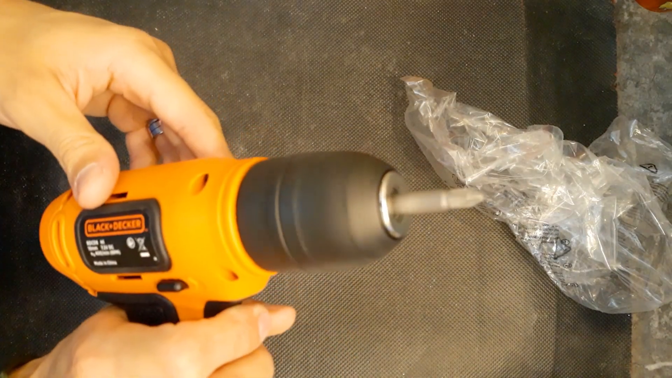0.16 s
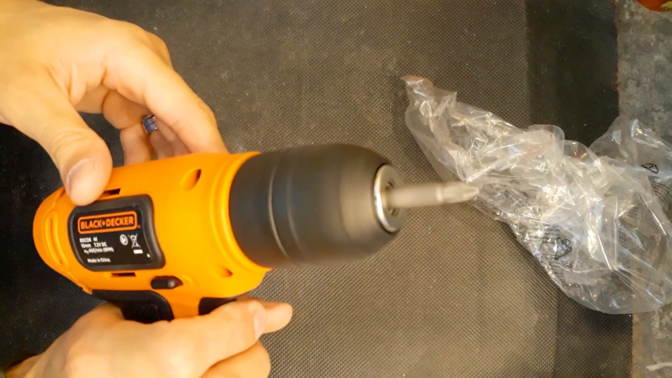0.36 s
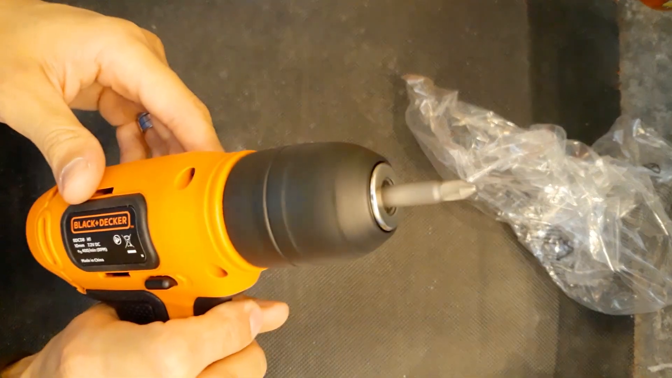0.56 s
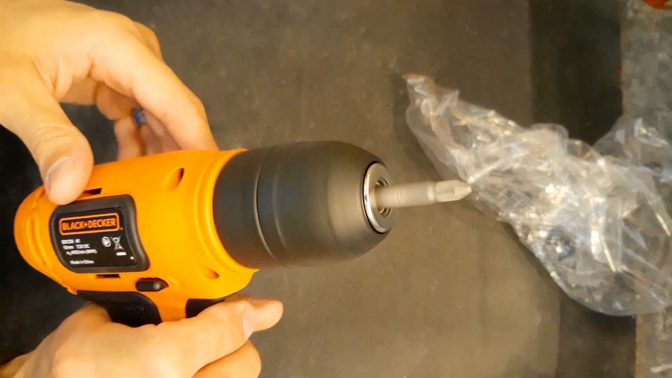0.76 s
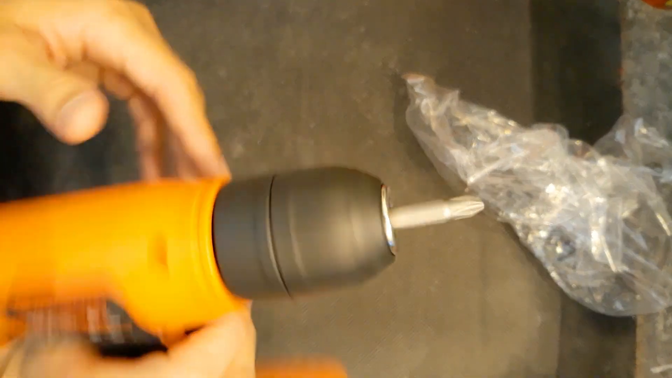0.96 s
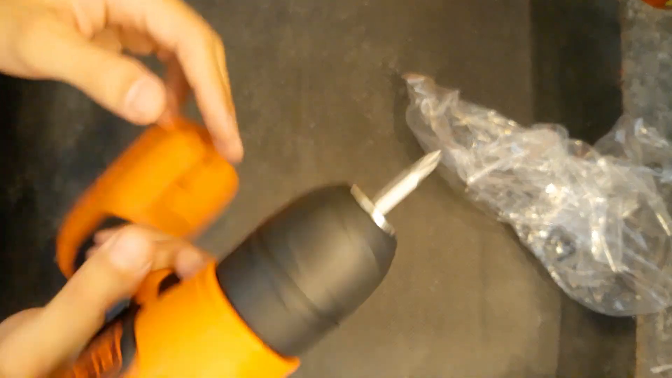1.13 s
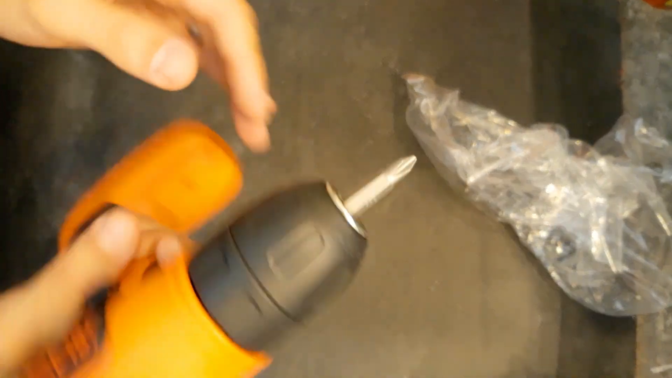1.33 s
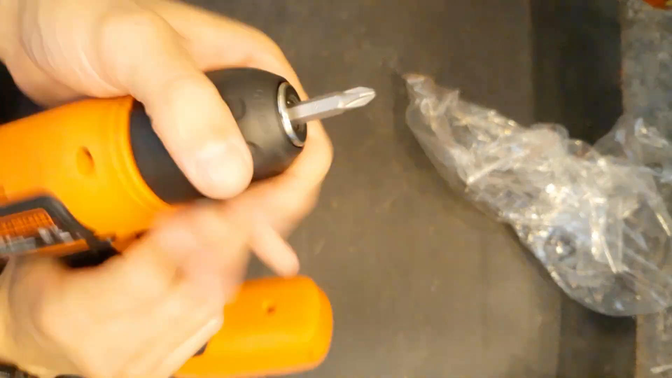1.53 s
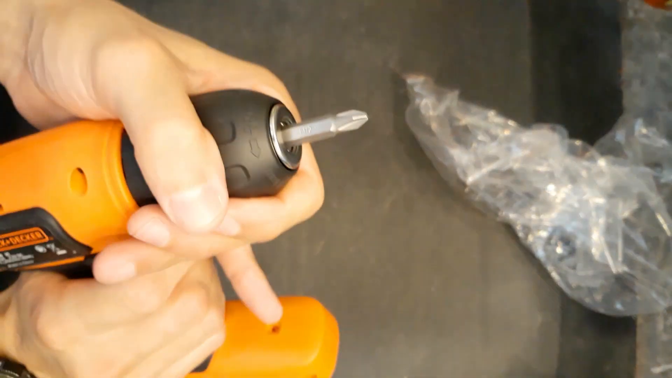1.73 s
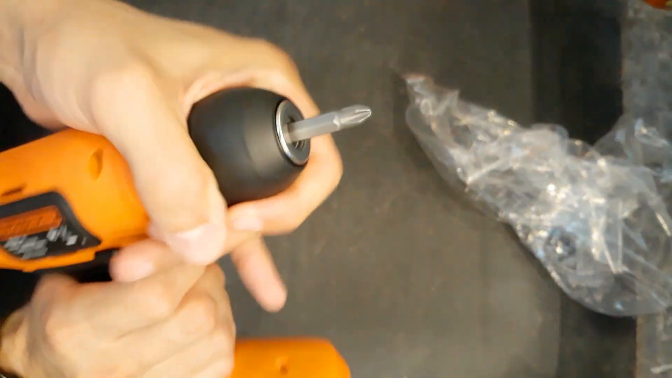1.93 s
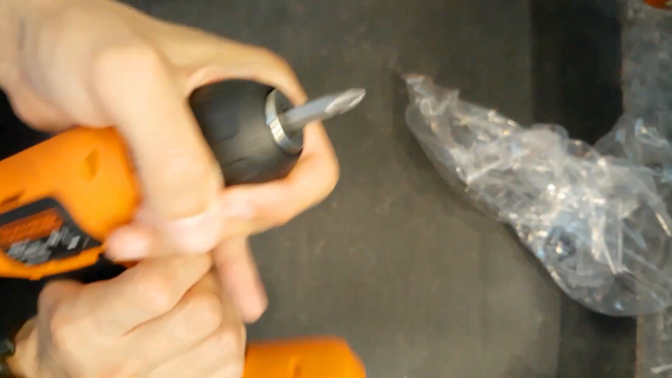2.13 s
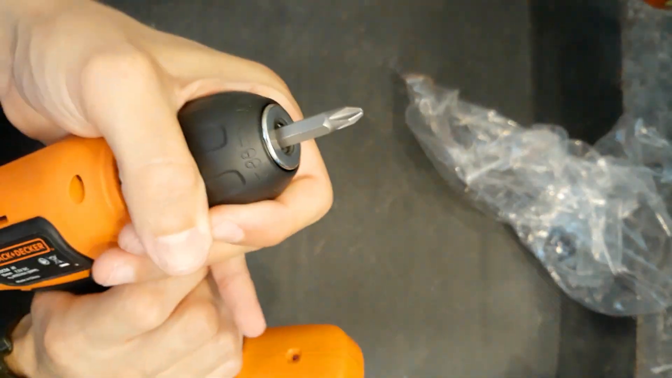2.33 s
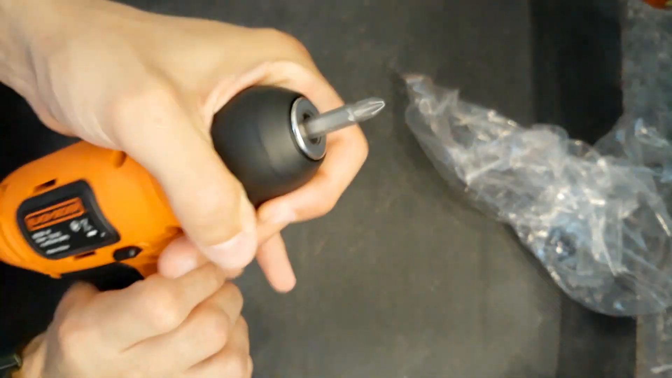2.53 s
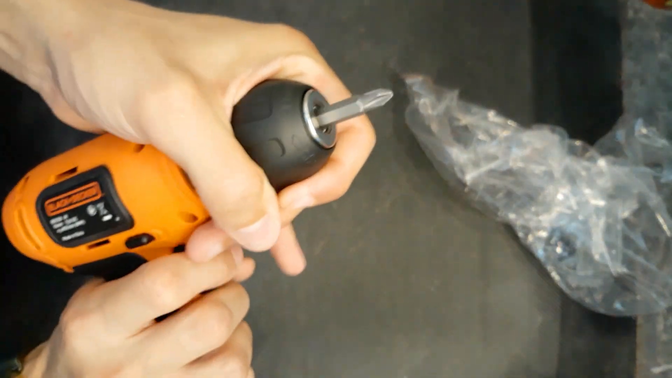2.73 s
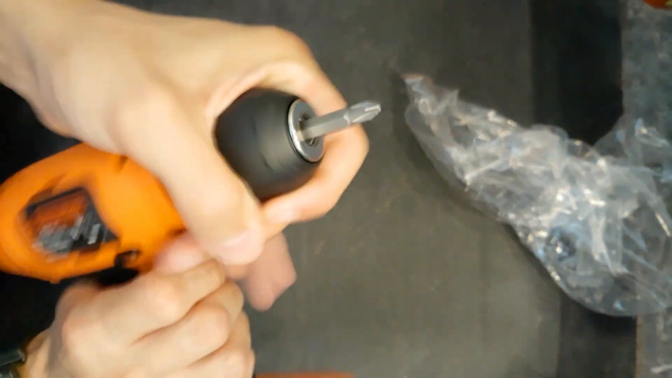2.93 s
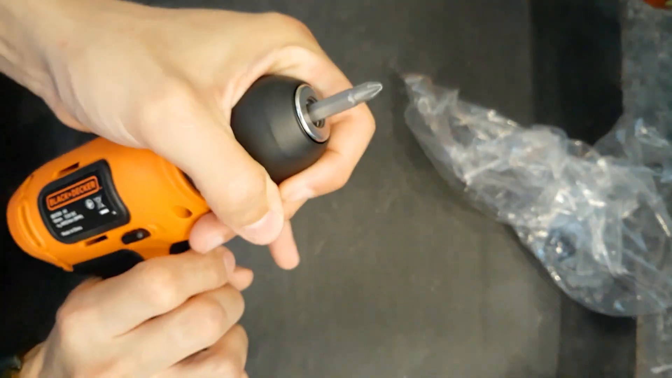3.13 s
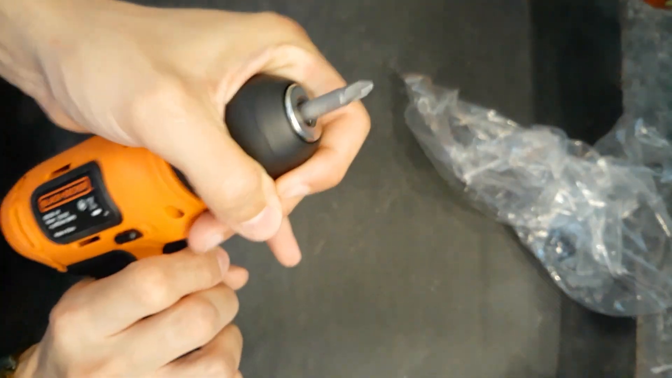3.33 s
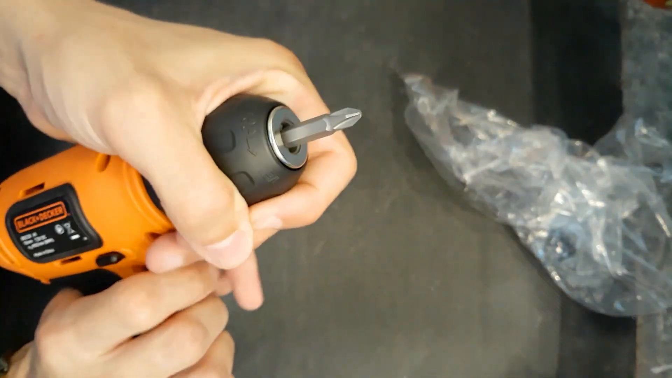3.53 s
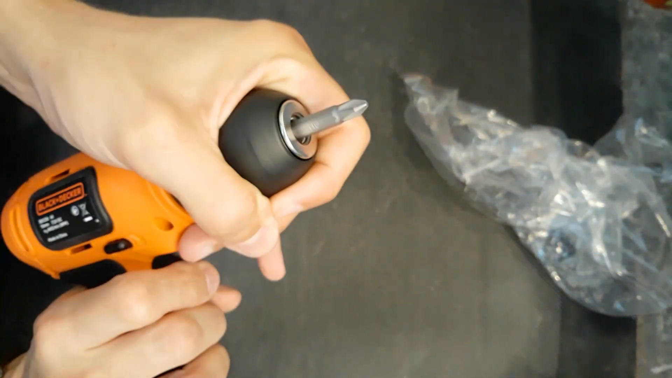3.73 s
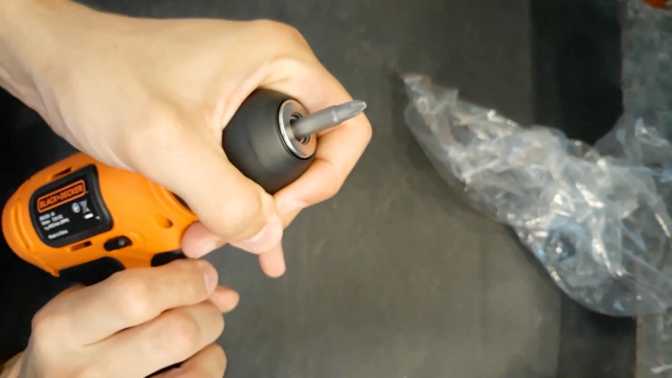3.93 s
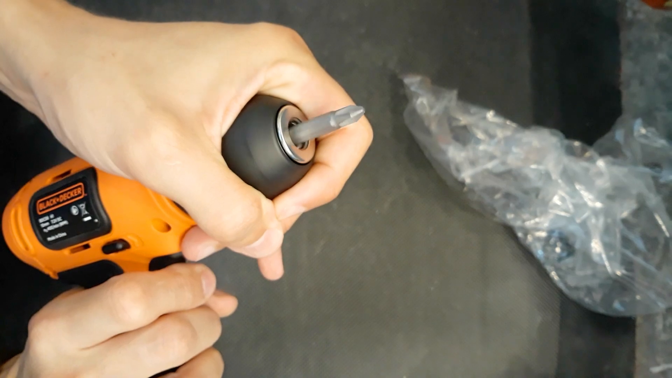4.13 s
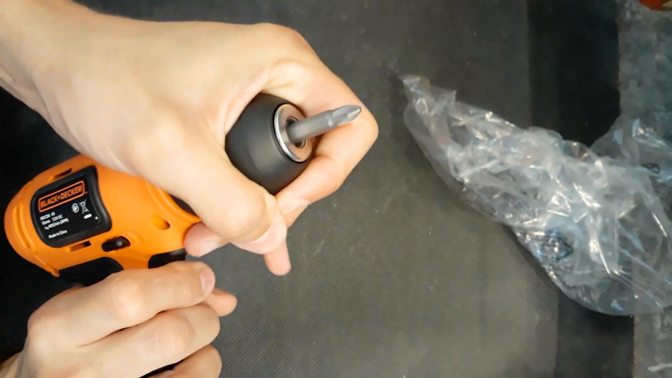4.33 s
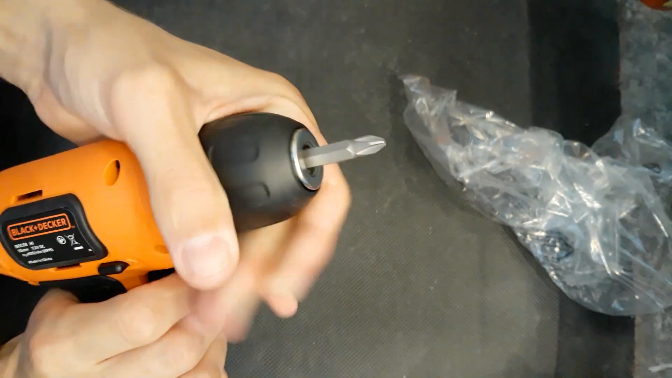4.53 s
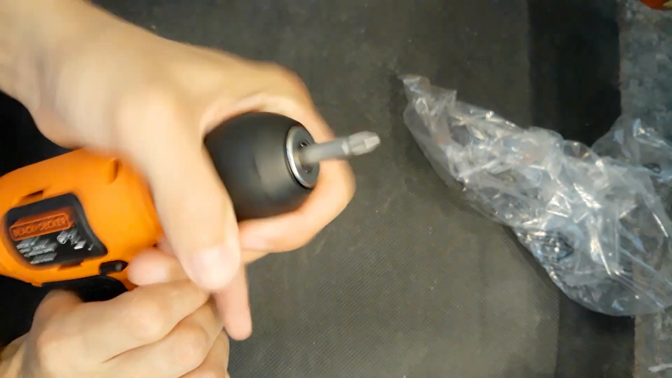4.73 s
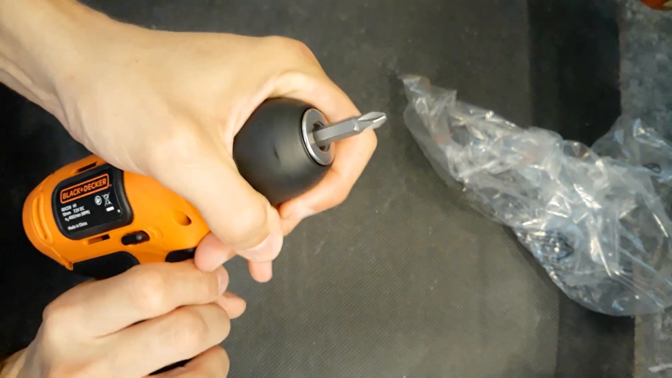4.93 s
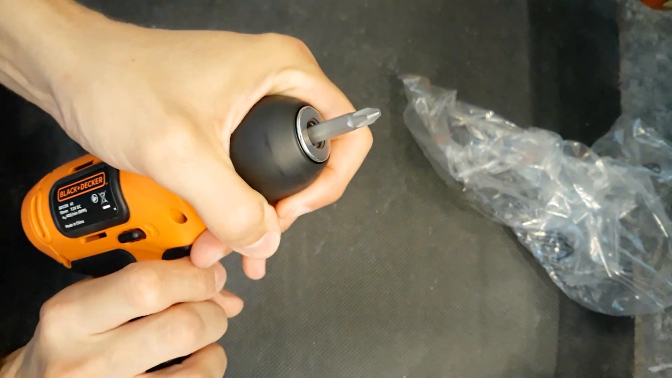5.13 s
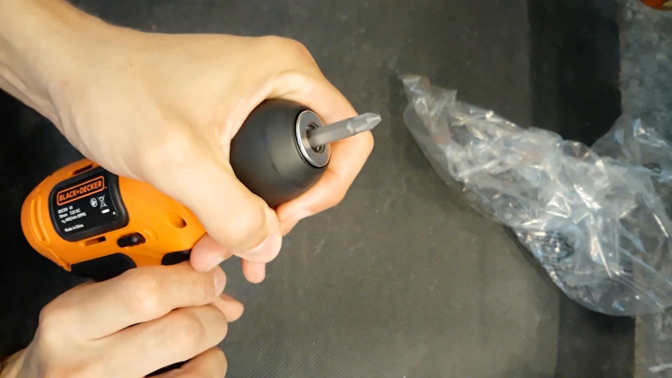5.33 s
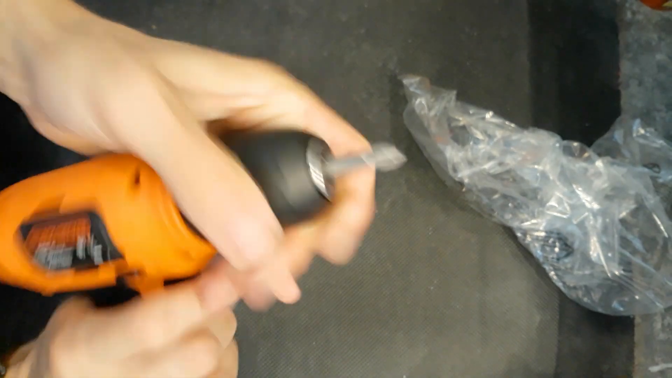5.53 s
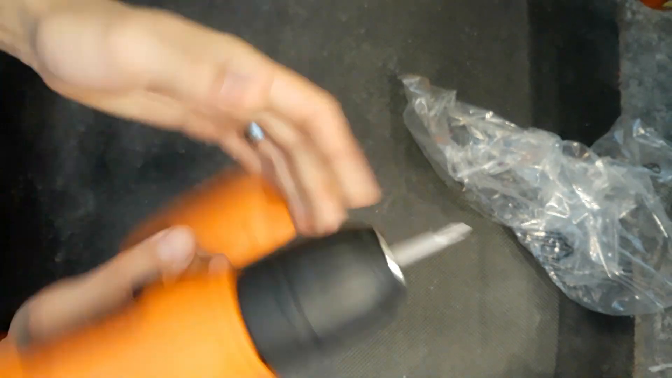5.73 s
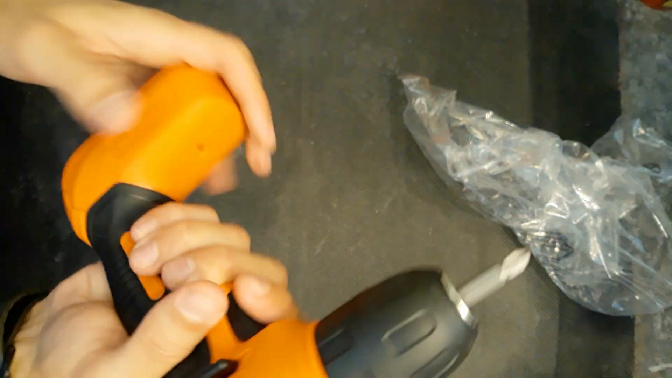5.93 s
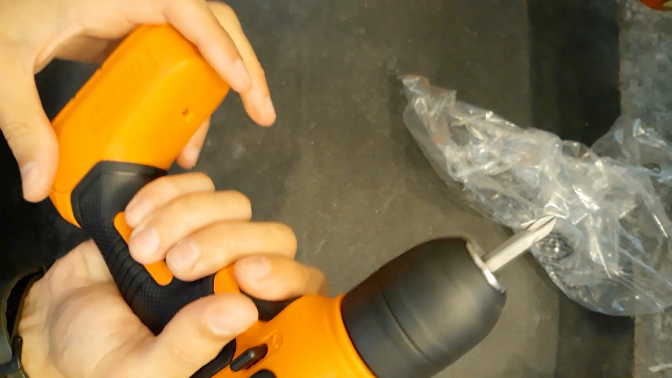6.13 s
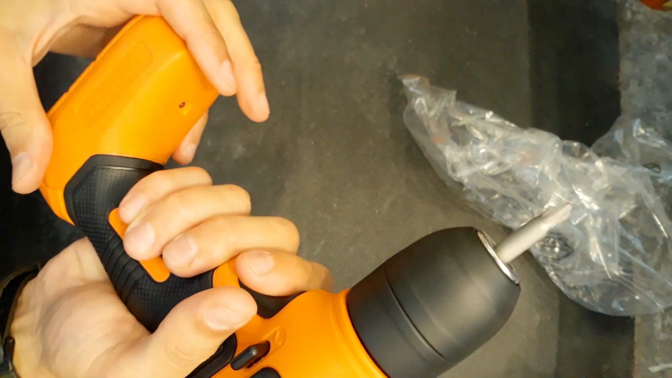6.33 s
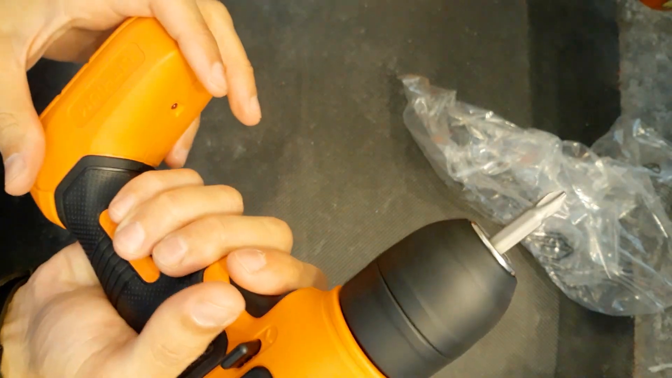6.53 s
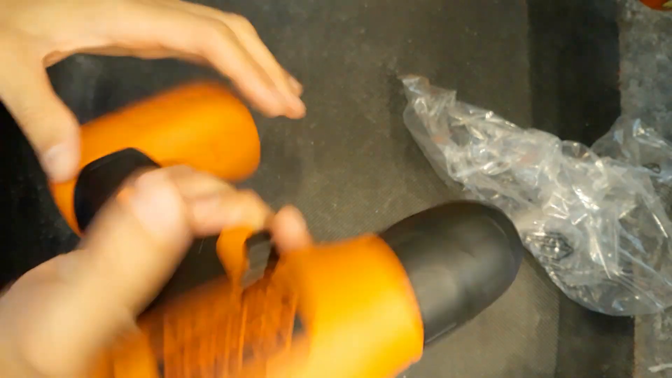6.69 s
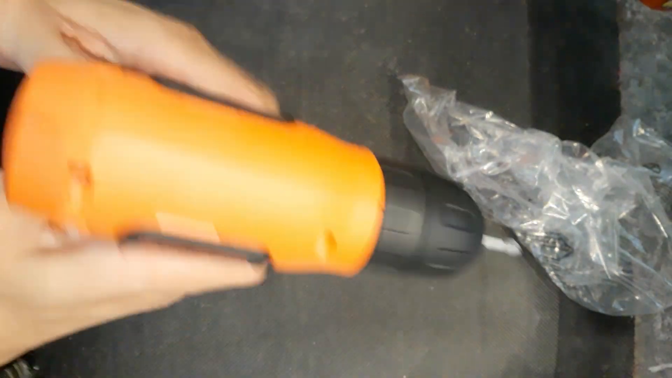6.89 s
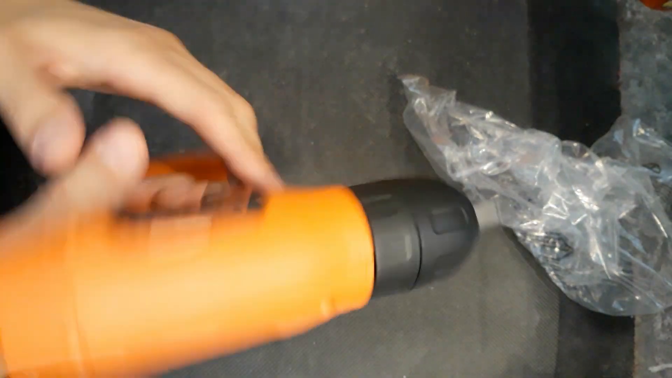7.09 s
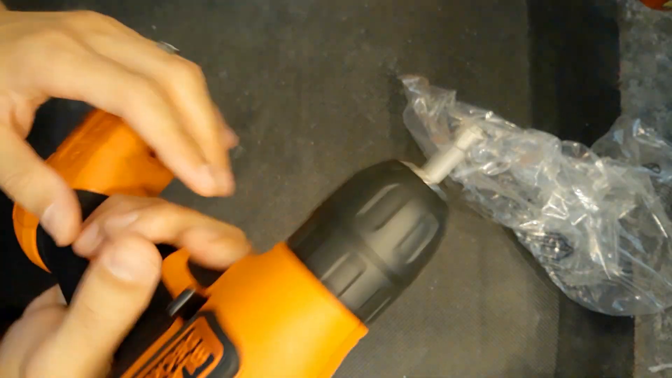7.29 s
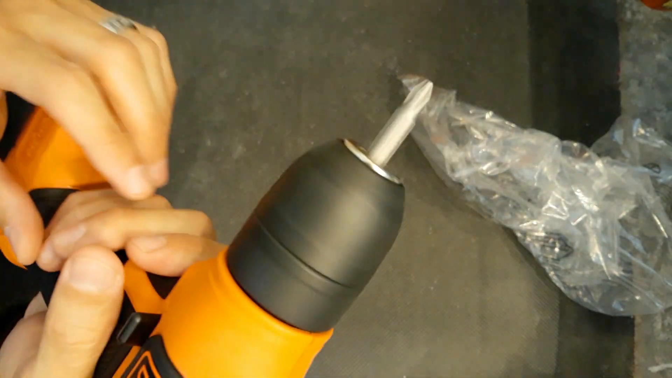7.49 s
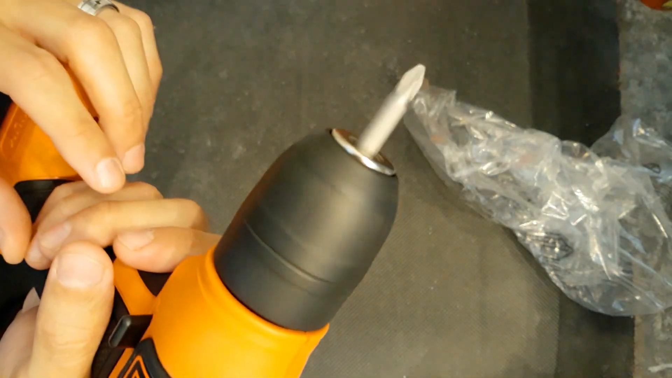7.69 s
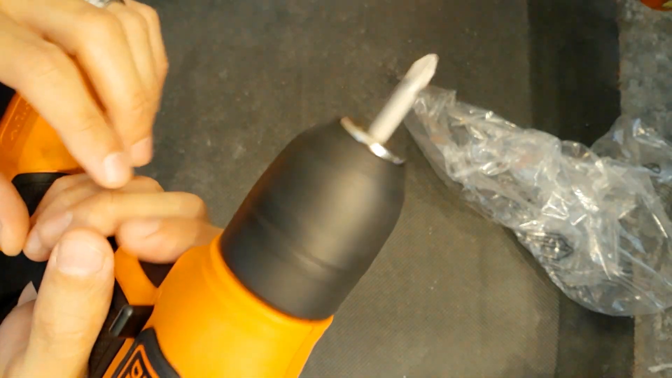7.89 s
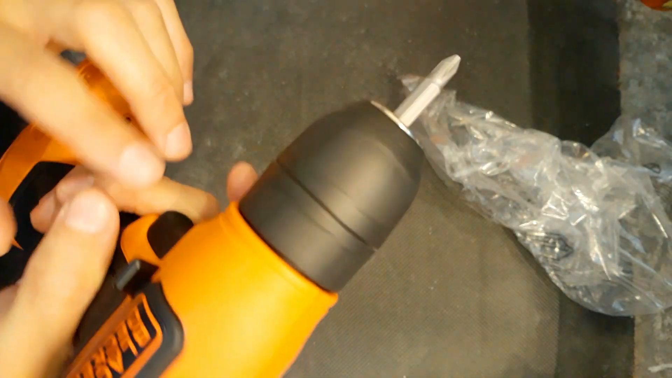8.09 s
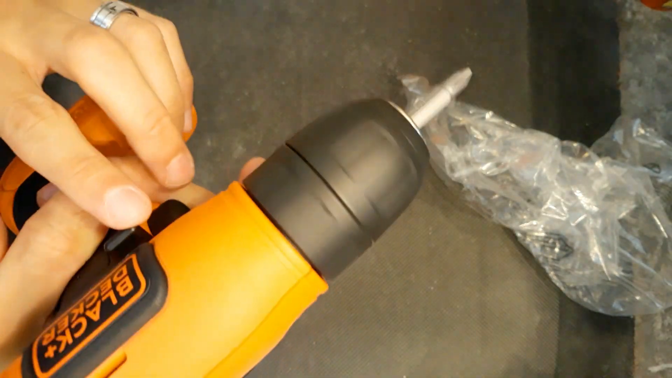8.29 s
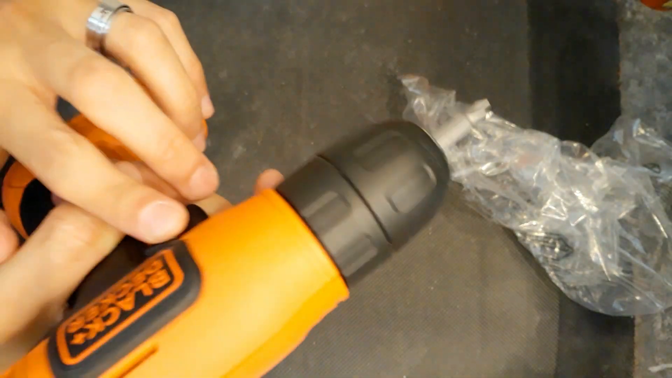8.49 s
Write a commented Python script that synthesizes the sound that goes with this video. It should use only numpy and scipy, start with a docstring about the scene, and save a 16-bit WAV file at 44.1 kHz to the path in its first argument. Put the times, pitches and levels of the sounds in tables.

```python
"""At a bench in a small room, a little cordless drill runs close by in eight bursts.
Running free, its motor whines over a rattle of loose gears, then coasts down. In five bursts a hand
brakes the chuck (the part that holds the bit), so the speed sags and the gear teeth grind.
Plastic parts click as the drill is turned over. Faint room air and mains hum lie behind it all."""
import sys
import numpy as np
from scipy import signal
from scipy.fft import rfft, irfft
from scipy.io import wavfile
from scipy.ndimage import uniform_filter1d, minimum_filter1d

SR = 44100
rng = np.random.default_rng(int(sys.argv[2]) if len(sys.argv) > 2 else 0)


def generate_wav(sig):
    """Save sig (samples, or channels by samples) to the path in sys.argv[1] as 16-bit PCM at SR."""
    pcm = np.round(np.clip(np.atleast_2d(sig).T, -1, 1) * 32767).astype(np.int16)
    wavfile.write(sys.argv[1], SR, pcm)


N = 377055
TIME, FREQS = np.arange(N) / SR, np.fft.rfftfreq(N, 1 / SR)
CLOCK = TIME[::32]  # coarser time steps for speed and loudness curves
FULL_SPEED = 317.6  # every shaft speed is in turns per second


def amp(db):
    """Turns decibels into a gain."""
    return 10 ** (np.asarray(db) / 20)


def unit(x):
    """Scales a signal to an average (rms) level of 1."""
    return x / np.sqrt(np.mean(x ** 2) + 1e-20)


def steady(x):
    """Evens out slow changes in level but keeps the fast grain."""
    return x / np.sqrt(abs(uniform_filter1d(x ** 2, 3000)) + 1e-12)


def look_up(points, hz):
    """Reads between rows of frequency and value, with octaves evenly spaced."""
    freqs, values = np.transpose(points)
    return np.interp(np.log(hz + 1), np.log(freqs + 1), values)


def colour(x, curve, resonances=(), extra_db=0):
    """Filters a sound by a broad tone curve with narrow peaks and dips on top."""
    peaks_db = sum(db / (1 + (2 * (FREQS - hz) / width) ** 2) for hz, width, db in resonances)
    return irfft(rfft(x) * amp(look_up(curve, FREQS) + peaks_db + extra_db), N)


def band(x, low_hz, high_hz):
    """Keeps only what lies between two frequencies."""
    cut = (1 + (low_hz / (FREQS + 1)) ** 16) * (1 + (FREQS / high_hz) ** 16)
    return irfft(rfft(x) / cut, N)


def wander(hz):
    """A smooth random wobble, up to about hz times a second."""
    return unit(irfft(rfft(rng.standard_normal(N)) * np.exp(-(FREQS / hz) ** 2), N))


def add(mix, start_s, sound):
    """Mixes a sound in at its start time."""
    part = mix[round(start_s * SR):][:len(sound)]
    part += sound[:len(part)]


def tones(turns, rows, flutter, flutter_hz):
    """Tones at multiples of one turning speed, each wavering in strength."""
    out = np.zeros(N)
    for multiple, db in rows:
        level = amp(db) * np.sqrt(2) * (1 + flutter * wander(flutter_hz))
        out += level * np.cos(2 * np.pi * (multiple * turns + rng.random()))
    return out


def room_air():
    """A soft, steady rush, strongest in the bass."""
    # Each row: frequency in Hz, relative level in dB.
    air_curve = [(18, -44), (30, -15), (62, -12), (85, -7), (177, -5), (284, -3), (420, -5.5), (575, -14),
                 (787, -13.5), (1400, -20.5), (1720, -14), (2020, -18.5), (4090, -13), (10200, -26),
                 (15500, -28)]
    treble_cut_db = -1.3 * np.log2(1 + FREQS / 6000)
    return amp(-53.5) * unit(colour(rng.standard_normal(N), air_curve, extra_db=treble_cut_db))


def mains_hum():
    """Mains power hums in four faint tones."""
    # Each row: pitch in Hz, level in dB.
    hum_tones = [(100, -66.5), (200, -68), (400, -63), (800, -71)]
    return tones(TIME, hum_tones, flutter=0.15, flutter_hz=4.4)


def drone(hz):
    """A low hum that wavers and now and then swells."""
    # Each row: peak time in seconds, half length in seconds, level in dB, pitch in Hz.
    swells = [(0.08, 0.13, -48, 250), (1.25, 0.09, -46.5, 250), (1.62, 0.18, -52, 250),
              (2.05, 0.08, -50, 250), (3.5, 0.09, -47.5, 300), (3.63, 0.08, -47, 250), (7.0, 0.1, -49, 300),
              (7.35, 0.08, -42, 300), (7.5, 0.06, -50, 250), (8.16, 0.09, -46, 250)]
    level = amp(-62.5 + 3.5 * wander(4))
    for peak_s, half_s, db, tone_hz in swells:
        if tone_hz == hz:
            level += amp(db) * np.exp(-((TIME - peak_s) / half_s) ** 2)
    return level * np.sin(2 * np.pi * hz * TIME)


def room_echo(x):
    """The walls return a short wash of sound in which the middle pitches last longest."""
    # Each row: frequency in Hz, seconds to fade by 60 dB.
    fade_times = [(200, 0.2), (1000, 0.51), (4000, 0.32), (15000, 0.19)]
    hz, t, spectrum = signal.stft(rng.standard_normal(SR // 2), SR, nperseg=256)
    fade = amp(-60 * t / look_up(fade_times, hz)[:, None])
    tail = signal.istft(spectrum * fade, SR, nperseg=256)[1]
    tail[:SR // 250] = 0  # the first echo takes 4 ms
    return signal.fftconvolve(x, tail / np.linalg.norm(tail))[:N]


def light_ticks():
    """Trigger, chuck jaws and fingers each make a tiny snap with a brief ring."""
    # Each row: start in seconds, level in dB, ring pitch in Hz.
    ticks = [(1.507, -47, 4500), (1.6, -49, 8600), (1.756, -47.5, 4500), (1.861, -45, 3900),
             (1.903, -41, 3700), (2.2, -32, 3400), (2.296, -45.5, 5200), (5.82, -50, 3840),
             (6.192, -38, 3800), (7.1, -47, 8300), (7.165, -50, 5070), (7.374, -49.5, 5100),
             (7.426, -52, 3500)]
    width_hz, ring_s, snap_s = 810, 0.011, 0.002
    out, t = np.zeros(N), TIME[:4096]
    hz = np.fft.rfftfreq(len(t), 1 / SR)
    for start_s, db, ring_hz in ticks:
        noise = rng.standard_normal(len(t))
        ring = unit(irfft(rfft(noise) / (1 + (2 * (hz - ring_hz) / width_hz) ** 2)))
        snap = amp(-4) * noise * np.exp(-t / snap_s)
        add(out, start_s, amp(db) * (ring * np.exp(-t / ring_s) + snap))
    return out


def loose_part_clacks():
    """Plastic and steel parts crack together and ring; they are too small to give off bass."""
    # Each row: start in seconds, level in dB, treble tilt in dB per octave, relative ring level in dB.
    clacks = [(5.9205, -26.5, -0.5, -14), (5.9315, -25.5, -1.5, -19), (5.959, -37, 5, -29),
              (8.4795, -32, 0, -22), (8.482, -9.5, 1.5, -28), (8.4895, -6.5, 1, -18.5)]
    # Each row: frequency in Hz, relative level in dB.
    crack_curve = [(240, -55), (400, 11), (673, -48), (1100, -4), (1360, -4), (1630, -4), (2510, -2),
                   (4630, -6), (5230, -2), (7210, -11), (15500, -21)]
    # Each row: pitch in Hz, relative level in dB, seconds to fade by 60 dB.
    part_rings = [(1155, 6, 0.071), (1650, -10, 0.11), (1880, 4, .1), (2350, -16, .07), (2830, -7, .06),
                  (3760, 6, .06), (5066, 7, 0.056), (5330, 6, .058), (7100, -3, 0.027), (8250, -10, .04)]
    out, t = np.zeros(N), TIME[:6000]
    hz = np.fft.rfftfreq(len(t), 1 / SR)
    fade = np.exp(-t / 0.0015) + amp(-13.5) * np.exp(-t / 0.019)  # sharp crack, then a softer tail
    for start_s, db, tilt_db, ring_db in clacks:
        shape = amp(look_up(crack_curve, hz) + tilt_db * np.log2((hz + 100) / 4000))
        crack = unit(irfft(rfft(rng.standard_normal(len(t))) * shape)) * fade
        ring = sum(amp(part_db - 60 * t / fade_s) * np.sin(2 * np.pi * (pitch * t + rng.random()))
                   for pitch, part_db, fade_s in part_rings)
        add(out, start_s, amp(db) * (crack + amp(ring_db) * ring))
    return signal.sosfilt(signal.butter(2, 800, "highpass", fs=SR, output="sos"), out)


def gear_rattle(turns, per_turn, spread_db, ring_s, hiss):
    """Loose teeth strike at random, more often at speed; each blow rings one spot of the gearbox."""
    strikes = rng.random(N) < per_turn * np.gradient(turns)
    blows = strikes * rng.standard_normal(N) * amp(spread_db * np.minimum(rng.exponential(1, N), 4))
    spots, t = 12, TIME[:512]
    spot = rng.integers(0, spots, N)
    rings = rng.standard_normal((spots, len(t))) * np.exp(-t / ring_s)
    knocks = sum(signal.oaconvolve(blows * (spot == k), unit(ring))[:N] for k, ring in enumerate(rings))
    return unit(knocks) + hiss * rng.standard_normal(N)


def loose_gears(turns, pace):
    """With no load the gears knock about inside the case, which rings differently as they slow."""
    # Each row: frequency in Hz, relative level in dB.
    case_curve = [(150, -51), (250, -22), (313, -27), (353, -23.5), (474, -10), (681, -17.5), (929, -6),
                  (1010, -5.5), (1850, -6), (2400, -5.5), (2900, 1.5), (4550, -0.5), (6100, -10),
                  (12000, -19), (15500, -13.5)]
    # What rings with fast gears and with slow ones. Each row: centre in Hz, width in Hz, boost in dB.
    fast_rings = [(495, 280, 1), (1610, 250, 6.5), (2750, 230, -1), (2910, 46, -0.5), (3400, 150, 3.5),
                  (3730, 140, 4), (4630, 220, 4), (5650, 170, 4), (9000, 1200, 1.5), (10100, 780, -11),
                  (11700, 900, 3.5), (12900, 600, -4)]
    slow_rings = [(1170, 86, 2), (1820, 90, 6), (2130, 1000, 0.5), (3370, 670, 8), (4500, 330, 4.5)]
    knocks = gear_rattle(turns, per_turn=9, spread_db=-0.5, ring_s=0.0015, hiss=1.0)
    fast = steady(colour(knocks, case_curve, fast_rings))
    slow = steady(colour(knocks, case_curve, slow_rings))
    slowness = np.clip(1.5 - 2.6 * pace, 0, 1)
    return (1 - slowness) * fast + slowness * slow


def motor_whine(turns, pace):
    """Spinning parts sing clean tones that follow the shaft; pace is 1 at full speed."""
    # In all four, each row: multiple of the shaft speed, relative level in dB.
    rotor_tones = [(1, -20.5), (2, -19), (3, -13.5), (4.18, -22.5), (5, -20.5), (6, -12.5), (7.2, -18)]  # rotor and fan
    contact_tones = [(9.36, -17), (10.56, -21), (12, -19), (18, -28), (23, -22), (24, -18), (27, -21),
                     (30, -26), (33, -27), (37, -30), (39, -26), (46, -35), (47, -34)]  # the commutator, the motor's spinning contacts
    whistle_tones = [(9, -6.5)]  # piercing at full speed
    overrun_tones = [(3, -14), (6, -10.5), (9, -16), (12, -14.5)]  # gears, as the chuck outruns the coasting motor
    rotor = band(tones(turns, rotor_tones, flutter=0.13, flutter_hz=24.5), 252, 16000) * pace
    buzz = tones(turns, contact_tones, flutter=0.22, flutter_hz=25) * pace ** 4
    whistle = tones(turns, whistle_tones, flutter=0.25, flutter_hz=10) * pace ** 5
    whistle_hz = whistle_tones[0][0] * FULL_SPEED * pace
    resonance_hz, width_hz = 2820, 85
    whistle *= 0.3 + 0.8 / (1 + (2 * (whistle_hz - resonance_hz) / width_hz) ** 2)
    mid_speed = np.exp(-((pace - 0.6) / 0.24) ** 4)
    overrun = tones(turns, overrun_tones, flutter=0.5, flutter_hz=30) * mid_speed
    return amp(-3.5) * rotor + buzz + whistle + amp(-1.7) * overrun


def grinding_gears(turns, speed, pace):
    """Under load the teeth meet unevenly, and throb as the circling planet gears come round."""
    # Each row: multiple of the shaft speed, relative level in dB.
    rough_tones = [(3, -8), (6, -2.5), (9, -21.5), (12, -3), (18, -2.5), (24, -2), (30, -1), (36, -2.5),
                   (42, -2.5), (48, -3.5), (54, -4), (60, -12)]
    # Each row: multiple of the shaft speed, relative level in dB when nearly stalled and when fast.
    clean_tones = [(3, -17, -19), (6.02, -42, -5.5), (11.99, -9.5, -21), (17.94, -36, -7.5),
                   (24.23, -30, -19)]
    # The case with a hand round the chuck. Each row: frequency in Hz, relative level in dB.
    held_curve = [(150, -56), (250, -25), (385, -21), (553, -9.5), (705, -18), (1140, -0.5), (1510, -5.5),
                  (1670, -7), (2020, -11), (3330, -3.5), (4960, 0.5), (7130, -8), (8770, -12.5),
                  (10100, -22.5), (15500, -20.5)]
    # Its resonances. Each row: centre in Hz, width in Hz, boost in dB.
    held_rings = [(528, 74, 2.5), (1220, 130, 1), (1243, 160, 3.5), (1655, 59, 9), (1815, 52, 6.5),
                  (2430, 270, 3.5), (3270, 330, 7.5), (4330, 400, 2), (8730, 1100, 3)]
    shaky_turns = turns + np.cumsum(speed * 0.017 * wander(129.55)) / SR
    rasp = tones(shaky_turns, rough_tones, flutter=0.3, flutter_hz=76) * np.sqrt(pace)
    ease = np.clip((pace - 0.37) / 0.36, 0, 1)  # 0 when nearly stalled, 1 when fast
    blended = [(multiple, slow + ease * (fast - slow)) for multiple, slow, fast in clean_tones]
    groan = tones(turns, blended, flutter=0.19, flutter_hz=50)
    chatter = gear_rattle(turns, per_turn=8, spread_db=3.3, ring_s=0.0013, hiss=0.6)
    chatter *= 1 - 0.25 * ease ** 2  # fast teeth stay in contact, so they rattle less
    throb = 1 + 0.27 * np.cos(2 * np.pi * 0.66 * turns + 0.9 * wander(21))
    return steady(colour((amp(-6.5) * rasp + groan + chatter) * throb, held_curve, held_rings))


def shaft_speed(on, off, driven, spin_up_s, friction):
    """The shaft runs up to its driven speed; once the trigger is let go, drag and friction stop it."""
    drag_per_s = 0.9
    powered = driven * (1 - np.exp(-np.maximum(CLOCK - on, 0) / spin_up_s))
    slowed = np.exp(-drag_per_s * np.maximum(CLOCK - off, 0))
    coasting = np.interp(off, CLOCK, powered) * slowed - friction / drag_per_s * (1 - slowed)
    return np.where(CLOCK < off, powered, np.maximum(coasting, 0))


def free_gains(speed, db, fade_speed, hiss_db, chatter_db):
    """Gains of low body, gears and brush hiss with no load: slower is quieter and duller."""
    pace = speed / FULL_SPEED
    level = amp(db) * np.tanh(speed / fade_speed) ** 1.4
    chatter_speed, slow_hiss_db = 180, -17.3
    chatter = amp(chatter_db * np.exp(-((speed - chatter_speed) / 45) ** 2))
    body = np.sqrt(chatter) * amp(-2.1 - 5.5 * pace)  # thins out at speed
    hiss = amp(slow_hiss_db + (hiss_db - slow_hiss_db) * pace ** 3)
    return level * np.array([body, chatter, hiss])


def free_burst(on, off, end_speed, creep, friction, db, fade_speed, hiss_db, chatter_db):
    """Speed, grip (none) and three gains as the motor runs up, holds nearly steady and coasts."""
    speed = shaft_speed(on, off, end_speed + creep * (CLOCK - off), spin_up_s=0.028, friction=friction)
    return [speed, np.zeros_like(speed), *free_gains(speed, db, fade_speed, hiss_db, chatter_db)]


def held_burst(curve, on, off, grip, bite_s, let_go_s, friction, db, hiss_db, body_db, coast_db):
    """Speed, grip and three gains as the motor strains against the hand until the trigger is let go."""
    driven = np.interp(CLOCK, *np.transpose(curve))
    speed = shaft_speed(on, off, driven, spin_up_s=0.017, friction=friction)
    pace = speed / FULL_SPEED
    load = (CLOCK >= on) * np.exp(-np.maximum(CLOCK - off, 0) / let_go_s)
    bite = 1 - np.exp(-np.maximum(CLOCK - on, 0) / bite_s)
    gears = amp(db) * pace ** 1.33 * bite
    squeal_db = 4 * np.exp(-((speed - 137) / 9) ** 2)  # here a gear tone meets a resonance of the case
    body = gears * amp(3.7 + body_db - 20 * pace + squeal_db)
    loaded = np.array([body, gears, gears * amp(hiss_db)])
    coasting = free_gains(speed, coast_db, fade_speed=248, hiss_db=-12.8, chatter_db=0)
    return [speed, grip * np.sqrt(load), *(load * loaded + (1 - load) * coasting)]


def drill():
    """One shaft drives every sound; the hand's grip trades free running for grinding."""
    # Each row: trigger on and off in seconds, speed at let-go, speed creep and friction in turns per
    # second each second, level in dB, speed below which it fades, relative hiss and chatter in dB.
    free_runs = [(-1, 0.903, 317.7, 2.7, 380, -21.1, 255, -7.7, 3.3),
                 (6.193, 6.533, 311.4, 0, 350, -22.8, 182, -9.7, -0.5),
                 (7.439, 8.008, 311.6, -2.5, 342, -22.2, 190, -9.7, -0.5)]
    # Each row: trigger on and off in seconds, grip from 0 to 1, bite and let-go times in seconds,
    # friction as above, then levels in dB for grinding, relative hiss, relative body and coasting.
    held_runs = [(1.904, 2.116, 0.73, 0.033, 0.01, 650, -5.8, -16.4, -1.1, -23),
                 (2.474, 2.772, 0.81, 0.018, 0.022, 530, -10.2, -15.5, 0.3, -28.5),
                 (2.996, 3.452, 0.78, 0.023, 0.044, 650, -10.7, -13, 1.2, -30.5),
                 (3.637, 4.47, 0.76, 0.026, 0.012, 590, -10.1, -13.3, -0.8, -23),
                 (4.806, 5.588, 0.78, 0.017, 0.015, 565, -9.3, -13.8, -0.6, -25)]
    # The speed the hand allows, one curve per held run. Each point: time in seconds, turns per second.
    held_speeds = [
        [(1.99, 239), (2.03, 222.3), (2.07, 184.5), (2.11, 178.4)],
        [(2.56, 240), (2.6, 228), (2.65, 200.8), (2.7, 185.1), (2.77, 184.1)],
        [(3.07, 211), (3.12, 192.7), (3.2, 185.5), (3.3, 179.8), (3.37, 184.8), (3.43, 212.7), (3.45, 206)],
        [(3.7, 193), (3.8, 175.4), (3.95, 169.7), (4.1, 165.8), (4.2, 160.4), (4.3, 145.5), (4.36, 134.3),
         (4.42, 152.4), (4.46, 162.8)],
        [(4.87, 200), (4.91, 185.8), (4.95, 146.2), (5.0, 115.6), (5.07, 103.5), (5.2, 109.3), (5.3, 118.1),
         (5.5, 123.5), (5.58, 173.3)],
    ]
    bursts = [free_burst(*row) for row in free_runs]
    bursts += [held_burst(curve, *row) for curve, row in zip(held_speeds, held_runs)]
    controls = np.max(bursts, axis=0)
    speed, grip, body_gain, gear_gain, hiss_gain = [np.interp(TIME, CLOCK, c) for c in controls]
    pace = speed / FULL_SPEED
    turns = np.cumsum(speed * (1 + 0.00065 * wander(9.5))) / SR
    # Between grips the hand rests on the chuck and muffles the whine.
    hand_on = (TIME >= held_runs[0][0]) & (TIME < held_runs[-1][1] + 0.3)
    muffling = 1 - uniform_filter1d(0.75 * hand_on, size=900)
    free = loose_gears(turns, pace) + muffling * motor_whine(turns, pace)
    sound = np.sqrt(1 - grip) * free + np.sqrt(grip) * grinding_gears(turns, speed, pace)
    body = amp(-2.0) * body_gain * steady(band(sound, 60, 2004))
    gears = amp(-0.9) * gear_gain * steady(band(sound, 1816, 8940))
    brush_hiss = amp(0.5) * hiss_gain * steady(band(sound, 8370, 15000))
    return body + gears + brush_hiss


def scene():
    """The drill and its handling clicks echo in a small room, over air and hum."""
    motor = drill()
    handling = loose_part_clacks() + light_ticks()
    echo = room_echo(amp(-9.5) * motor + amp(-6.5) * handling)
    background = room_air() + mains_hum() + drone(hz=250) + drone(hz=300)
    return (motor + handling + echo + background)[None]


def record(dry):
    """A fast limiter turns down the loudest peaks, then a filter cuts the highest treble."""
    allowed = np.minimum(1, 0.95 / (abs(dry) + 1e-9))
    gain = uniform_filter1d(minimum_filter1d(allowed, size=160), size=160)
    low_pass = signal.firwin(511, cutoff=15800, window=("kaiser", 9), fs=SR)
    return signal.oaconvolve(dry * gain, low_pass[None], "same")


dry = scene()
out = record(dry)
generate_wav(out)
```